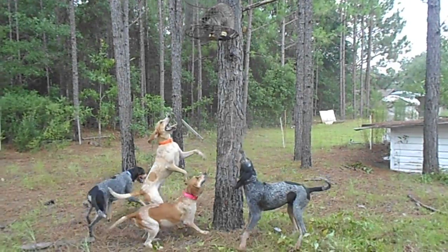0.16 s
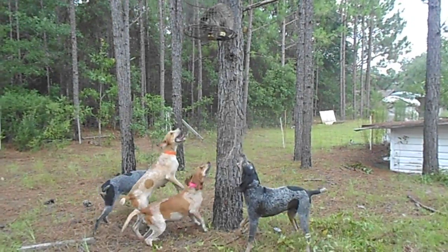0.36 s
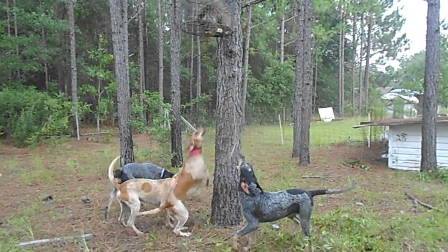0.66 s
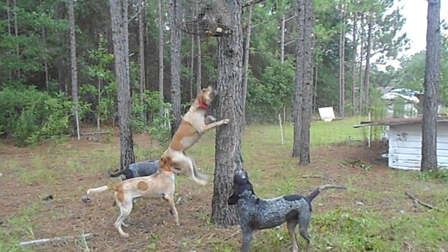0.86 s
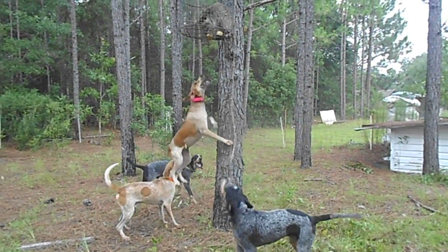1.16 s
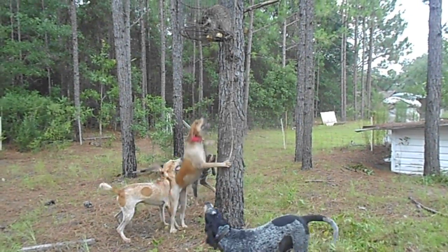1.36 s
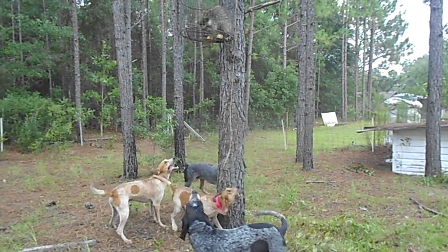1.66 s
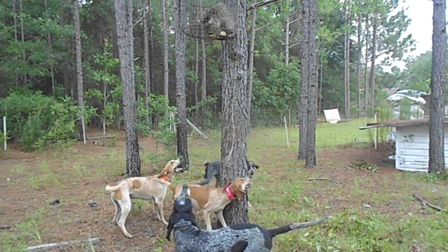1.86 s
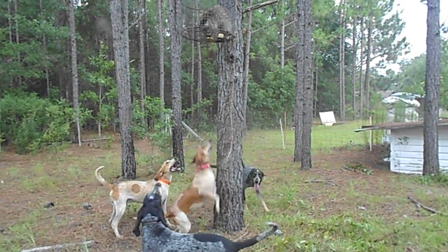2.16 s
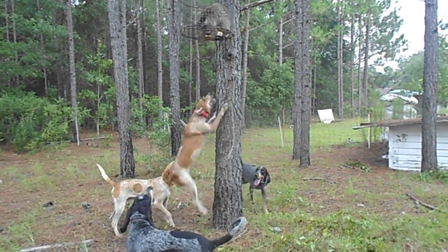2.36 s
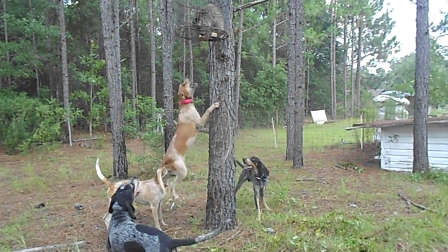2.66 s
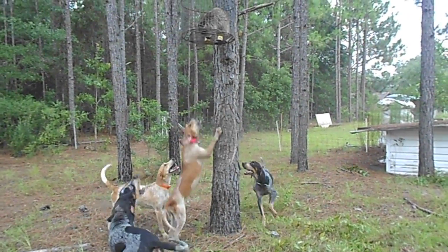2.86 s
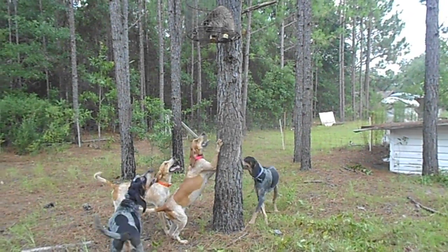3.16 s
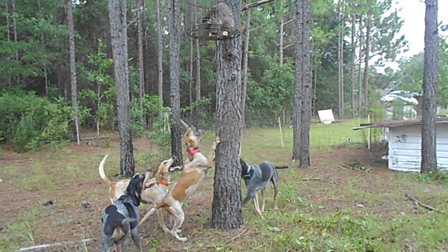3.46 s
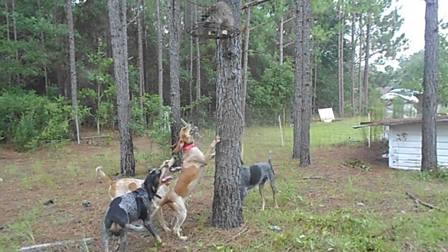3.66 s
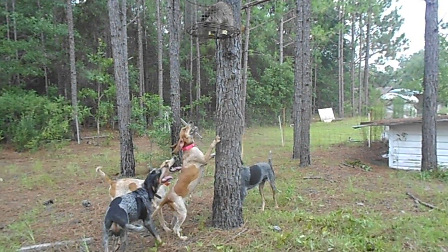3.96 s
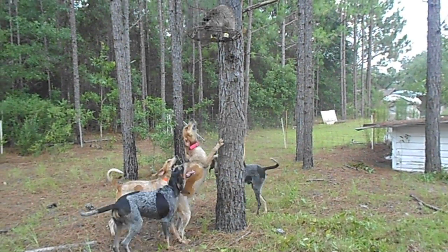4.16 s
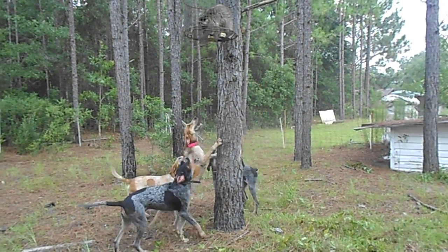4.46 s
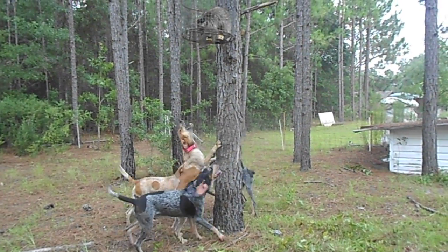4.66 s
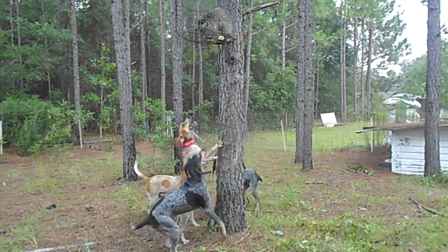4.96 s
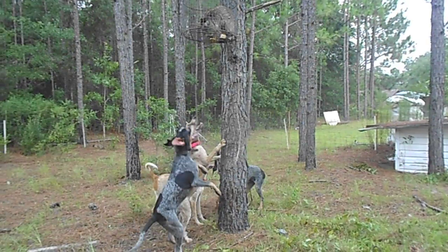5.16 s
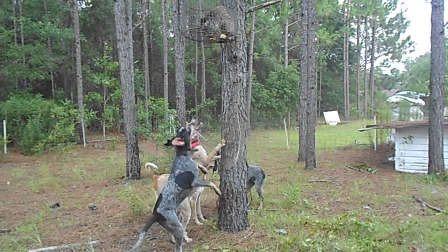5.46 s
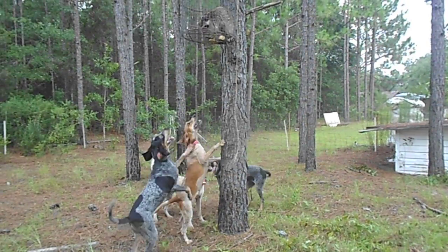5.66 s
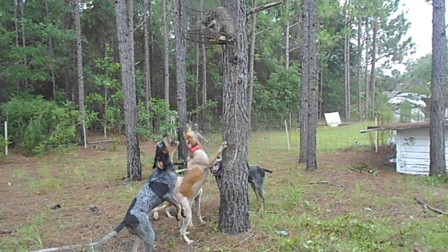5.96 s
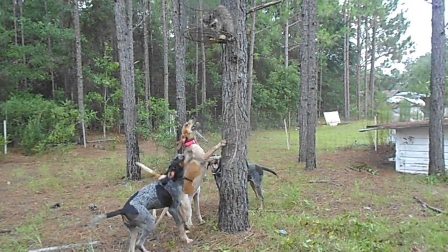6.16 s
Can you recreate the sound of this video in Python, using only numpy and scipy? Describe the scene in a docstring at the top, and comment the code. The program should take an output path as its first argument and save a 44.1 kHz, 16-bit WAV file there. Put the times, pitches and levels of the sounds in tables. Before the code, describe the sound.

A pack of hounds bays up a tree in a pine wood, falling howls that break low alternating with rough barks, yips and hoarse bawls.

```python
"""A short yip over a rustling pine wood, then a clear howl that breaks low: a pack of hounds bays up a tree.
Falling howls alternate with rough barks and hoarse bawls, among yips, whines and thin squeaks.
Voices are harmonic sums shaped by throat and mouth, with roughness as random modulation; squeaks are sines.
Trunks echo singly and far trees ring in a noise tail; rustle is shaped noise. Rustle and ring sink under
the cries and swell in the pauses. Fierce onsets overload, a limiter holds peaks, the loudest bark crackles."""
import sys
import numpy as np
from scipy import signal
from scipy.io import wavfile
from scipy.ndimage import uniform_filter1d, minimum_filter1d

SR = 44100
rng = np.random.default_rng(int(sys.argv[2]) if len(sys.argv) > 2 else 0)


def pcm_store(signal):
    """Save signal as 16-bit PCM."""
    levels = np.round(np.clip(np.atleast_2d(signal), -1, 1) * 32767)
    wavfile.write(sys.argv[1], SR, levels.astype(np.int16).T)


N = 279153
TIME_S = np.arange(N) / SR

# Relative rustle spectrum of pine straw and air in the trees: freq_hz, density_db_per_hz
RUSTLE_SPECTRUM = [(20, -23), (60, -6), (150, -11.5), (260, -12.5), (520, -7), (1050, -7), (1500, -15),
                   (2700, -26), (3500, -38), (5500, -57.5), (8000, -33), (10100, -26), (11500, -45),
                   (13000, -62.5)]
# Decay of the wood's ring: freq_hz, t60_s
WOOD_DECAY = [(200, 0.54), (600, 1.1), (1200, 1.4), (3000, 1.3), (9000, .2)]
# Relative resonance curve of the throat: freq_hz, response_db
THROAT_RESPONSE = [(150, -32), (280, -3.5), (450, 8.5), (600, -4), (800, 5.5), (1100, -4.5), (1400, -11.5),
                   (1900, -25.5), (2500, -43), (3400, -64.5), (5200, -76), (7000, -69.5), (9500, -51),
                   (11500, -70)]
# Thin high squeaks: start_s, length_s, pitch_hz, level_db
SQUEAK_EVENTS = [(0.025, .06, 7100, -54.5), (0.701, .07, 7150, -51), (3.848, .04, 8100, -50)]
# Short yips, some alone, some as a howl begins or gives out:
# start_s, length_s, top_pitch_hz, level_db, open_mouth_db
YIP_EVENTS = [(0.07, 0.083, 375, -22.5, -3), (0.303, 0.061, 558.7, -22.5, -4),
              (0.51, .04, 420, -28.5, -4.5), (1.169, 0.031, 489.4, -24, 2), (2.516, .068, 575, -16, 3.5),
              (3.136, 0.047, 494.4, -27, 9.5), (6.166, 0.023, 494, -25, 3.5)]
# Head-voice whines: start_s, length_s, first_pitch_hz, last_pitch_hz, first_level_db, last_level_db,
# open_mouth_db, edge_db, roughness_0_to_1
WHINE_EVENTS = [(0.102, .036, 1035, 647, -5, -10.5, 10, 1.5, 0.3),
                (1.845, 0.081, 675, 740, -47, -27, 35, 10, .06),
                (2.75, 0.083, 750, 538.5, -7.5, -19, -10.5, 4, .45),
                (4.181, .084, 690, 817, -36.5, -29.5, 43.5, 29.5, .12),
                (4.657, 0.049, 755, 758.5, -27.5, -19.5, -0.5, 6, 0)]
# Hoarse held notes, one curve each: time_s, pitch_hz, level_db, open_mouth_db, edge_db, roughness_0_to_1
BAWL_CURVES = [
    [(1.335, 393.3, -35, 10, 9, .95), (1.39, 418.2, -13.5, 26.5, 5.5, 0.1),
     (1.412, 488, -18.5, -2.5, -11.5, .26), (1.52, 497, -16, 0.5, -19.5, .22),
     (1.62, 495, -15, -7, -5.5, .25), (1.662, 512.7, -16.5, 10, 7, .48), (1.69, 571, -21, -2, 0.5, .54),
     (1.76, 577.4, -19, -18.5, -16, .12), (1.81, 538, -31, -4.5, 5.5, .5)],
    [(4.835, 515.4, -30.5, -15, -12.5, 0.1), (4.9, 529.6, -22.5, -10, -9, 0.1),
     (4.945, 467.7, -25.5, 1.5, -9.5, 0.8), (5.0, 446.6, -23.5, 2, -18, 0.4),
     (5.055, 512.7, -20, -7.5, -17.5, 0.6), (5.18, 500, -24.5, -4, -16, .55),
     (5.262, 483.4, -34.5, -2, -2.5, 0.9)],
]
# Barks that climb, roughen at the turn and close duller: start_s, length_s, attack_s, climb_s, turn_after_s,
# final_drop_s, top_pitch_hz, closing_pitch_hz, head_level_db, head_level_at_turn_db, closing_level_db,
# turn_roughness (clipped to 0-1), period_doubling_db
BARK_EVENTS = [(2.658, .248, .048, .105, .125, 0.0042, 535, 547, -12.5, -20, -21.5, .9, 7),
               (3.36, .252, .044, .105, .135, .01, 560, 539, -17, -17.5, -21, .7, -9),
               (3.976, 0.2, 0.039, .08, .105, .028, 498, 558.6, -6.5, -15.5, -21, 0.8, -12.5),
               (4.575, 0.26, .07, 0.11, .15, .04, 520, 546, -36, -26.5, -26.5, 1.1, -2),
               (5.255, .226, .035, 0.078, .118, 0.013, 530, 535, -27, -16.5, -21, 0.9, -9)]
# Howls that slide down and break: start_s, high_part_s, low_part_s, attack_s, slide_time_s, top_pitch_hz,
# pitch_before_break_hz, pitch_after_break_hz, high_level_db (before gape lift), low_level_db,
# opening_gape_db, gape_held_s, opening_roughness_0_to_1, high_edge_db (before gape lift), low_edge_db
HOWL_EVENTS = [(.124, .112, .115, 0.0028, .2, 518.8, 562.8, 448.8, -16.5, -17.5, 41, .046, 0.4, 4, -12.5),
               (0.737, .157, .295, 0.013, .07, 793.7, 527, 437.1, -14, -18.5, 29, 0.022, .05, 0, -5.5),
               (1.918, 0.14, 0.1, 0.099, .055, 707, 533.3, 423, -13.5, -19, 14.5, .03, .08, 0, -3),
               (2.89, .161, .12, .045, 0.058, 678, 532.8, 422.6, -13, -21.5, 10.5, 0.026, 0.4, -5.5, -9),
               (4.255, .138, 0.16, 0.049, 0.036, 786.5, 526.3, 413.7, -15.5, -24, 13.5, .07, .15, -4, 1.5),
               (5.782, 0.18, .222, .01, .4, 607.5, 495, 431.8, -15.5, -18, 37, .074, 0.3, 2, -7.5)]
# Onsets that overload: from_s, to_s, crest_cut_share
OVERLOAD_SPANS = [(0.105, 0.157, 0.31), (5.793, 5.817, 0.14)]
# Crackles in the loudest bark: time_s
CRACKLE_TIMES_S = [4.0087, 4.011, 4.014, 4.0166, 4.0196, 4.0259, 4.0272, 4.0345, 4.0366]

# background level between cries and under them; threshold of a loud cry; time constants
OPEN_DB, SUNK_DB, LOUD_DB = -37, -60.5, -38
LAG_S, SINK_S, RECOVER_S = 0.11, 0.19, 0.1

# all voices; width on a natural-log frequency axis
MOUTH_HZ, MOUTH_WIDTH_LN = 1070, 0.23
# growth of rasp from one harmonic to the next
GRUFF_RISE, HOARSE_RISE = 0.12, 0.45

# yips: arch as a share of pitch
YIP_ARCH_SHARE, YIP_ENDS_DB, YIP_EDGE_DB, YIP_ROUGH = 0.27, -12, -4, 0.2
BAWL_DOUBLING_DB = -18.5

# barks: first pitch and final drop as shares of pitch, widths and positions as shares of length
BARK_START_SHARE, BARK_DROP_SHARE, BARK_ONSET_DB, BARK_RELEASE_S = 0.56, 0.28, -24, 0.01
TURN_WIDTH_SHARE, DOUBLING_AT_SHARE = 0.11, 0.74
HEAD_MOUTH_DB, HEAD_EDGE_DB, CLOSE_MOUTH_DB, CLOSE_EDGE_DB, BARK_ROUGH = 7.5, 11.5, 3.5, -16.5, 0.36
PUSH_DB, PUSH_BEFORE_END_S, PUSH_WIDTH_S = 7, 0.0073, 0.012  # a last shove of breath

# howls: high register with narrowed mouth, lingering after the break
BREAK_S, GAPE_CLOSE_S, HOWL_RELEASE_S = 0.029, 0.0076, 0.0047
SHUT_DB, HIGH_ROUGH, LINGER_DB = -10, 0.11, -18
GAPE_LEVEL_DB_PER_DB, GAPE_EDGE_DB_PER_DB = 0.16, 0.6
# howls: low register, which sags and then drops as the breath runs out (shares of pitch)
LOW_MOUTH_DB, LOW_DOUBLING_DB, LOW_FADE_DB = 10.5, -10.5, -15
LOW_SAG_SHARE, LOW_DROP_SHARE, LOW_ROUGH, SPENT_ROUGH = 0.092, 0.22, 0.16, 0.69

# limiter ceiling and hard crackle limit (shares of full scale); band limit
CEILING, PEAK, BAND_LIMIT_HZ = 0.72, 0.76, 16500


def gain_of(db):
    """Decibels to amplitude."""
    return 10 ** (np.asarray(db) / 20)


def evened(x):
    """Scales to rms 1."""
    return x / np.sqrt(np.mean(abs(x) ** 2) + 1e-20)


def read(points, hz):
    """Interpolates a table on a log-frequency axis."""
    table_hz, value = np.transpose(points)
    return np.interp(np.log(hz + 1), np.log(table_hz + 1), value)


def add(mix, start_s, sound):
    """Adds a sound to the mix in place."""
    part = mix[max(round(start_s * SR), 0):][:len(sound)]
    part += sound[:len(part)]


def ages(length_s):
    """Seconds since the start of an event."""
    return np.arange(0, length_s, 1 / SR)


def ramp(x):
    """Rises from 0 to 1 and stays there."""
    return np.clip(x, 0, 1)


def ease(x):
    """A soft step from 0 to 1 around x = 0."""
    return 0.5 + 0.5 * np.tanh(x / 2)


def bell(x):
    """A bell of height 1 around x = 0."""
    return np.exp(-0.5 * x ** 2)


def bump(hz, centre_hz, width_ln):
    """A bell of height 1 on a log-frequency axis."""
    return bell(np.log(hz / centre_hz) / width_ln)


def wander(t_s, width_hz, size=2048):
    """Smooth complex noise: Gaussian-shaped spectrum, rms 1 over one second."""
    hz = np.fft.fftfreq(size, 1 / size)
    noise = rng.standard_normal(size) + 1j * rng.standard_normal(size)
    smooth = evened(np.fft.ifft(noise * bell(hz / width_hz)))
    return np.interp((t_s - t_s[0]) * size, np.arange(size), smooth)


def rustle(patchy_db=2.5, flicker_db=2.33):
    """Paws shuffle in pine straw: rms-1 noise, patchy in time and pitch, flickering over all bands."""
    frames, hz = N // 128 + 5, np.fft.rfftfreq(512, 1 / SR)
    real, imag, patches = rng.standard_normal((3, frames, len(hz)))
    patches = uniform_filter1d(patches, size=10, axis=0)
    patches = evened(uniform_filter1d(patches, size=10, axis=1))
    flicker = evened(uniform_filter1d(rng.standard_normal(frames), size=3))[:, None]
    shape_db = read(RUSTLE_SPECTRUM, hz) + patchy_db * patches + flicker_db * flicker
    spectrum = (real + 1j * imag) * gain_of(shape_db)
    return evened(signal.istft(spectrum.T, nperseg=512, noverlap=384)[1][:N])


def background_db(hounds, step=256):
    """Background level: sinks slowly under loud cries and recovers in the pauses, always a little late."""
    power = abs(uniform_filter1d(hounds ** 2, size=4 * step))[::step]
    loud = ease((10 * np.log10(power + 1e-12) - LOUD_DB) / 2)
    sunk = [0.]
    for share in loud[1:]:
        sinking = share * (1 - sunk[-1]) / SINK_S
        recovering = (1 - share) * sunk[-1] / RECOVER_S
        sunk.append(sunk[-1] + step / SR * (sinking - recovering))
    return OPEN_DB + (SUNK_DB - OPEN_DB) * np.interp(TIME_S - LAG_S, TIME_S[::step], sunk)


def wood(x):
    hz, t_s, spectrum = signal.stft(rng.standard_normal(SR * 3 // 2), SR, nperseg=256)
    decay = gain_of(-60 * t_s / read(WOOD_DECAY, hz)[:, None])
    build_up = 1 - np.exp(-t_s / 0.09)
    tail = signal.istft(spectrum * decay * build_up, SR, nperseg=256)[1]
    return evened(signal.fftconvolve(x, tail)[:N]) * np.std(x)


def trunks(x, near_db=-21, count=8):
    """Single quick echoes off the ground and the nearest trees."""
    taps = np.zeros(SR // 10)
    delays = (rng.uniform(0.004, 0.06, count) * SR).astype(int)
    taps[delays] = rng.choice([-1., 1.], count)
    return gain_of(near_db) * signal.oaconvolve(x, taps / np.sqrt(count))[:N]


def squeak(start_s, length_s, pitch_hz, level_db, waver=0.012):
    """A faint whistle: one sine of wavering pitch under a half-sine swell."""
    age = ages(length_s)
    wavering_hz = pitch_hz * (1 + waver * wander(age, width_hz=40).real)
    phase = 2 * np.pi * np.cumsum(wavering_hz) / SR
    return start_s, gain_of(level_db) * np.sin(np.pi * age / length_s) * np.sin(phase)


def cry(t_s, pitch_hz, level_db, mouth_db, edge_db, rough, doubled, rasp_rise, nasal_db, bright_db,
        nasal_hz=2150, bright_hz=4000, jitter=0.041, flutter_hz=85, rasp=0.79, between=1.0, count=44):
    """Vocal-fold harmonics, shaken by roughness, shaped by throat, open mouth (near 1 kHz) and treble edge."""
    rough = np.clip(rough, 0, 1)
    shake = jitter * (0.33 + 2 * rough) * wander(t_s, flutter_hz).real
    phase = 2 * np.pi * np.cumsum(pitch_hz * (1 + shake)) / SR
    voice, power = np.zeros(len(t_s)), np.zeros(len(t_s))
    for k in np.arange(1, count) / 2:
        hz = k * pitch_hz
        timbre_db = read(THROAT_RESPONSE, hz)
        timbre_db += nasal_db * bump(hz, nasal_hz, 0.14) + bright_db * bump(hz, bright_hz, 0.11)
        timbre_db += mouth_db * bump(hz, MOUTH_HZ, MOUTH_WIDTH_LN)
        timbre_db += edge_db * ramp(np.log2(hz / 1100))
        # the voice ends with the throat's range
        size = gain_of(timbre_db) * ramp((THROAT_RESPONSE[-1][0] - hz) / pitch_hz + 0.5)
        smear = ramp(rasp * rough * (1 + rasp_rise * (k - 1)))  # high harmonics lose their line first
        if k % 1:  # between harmonics: only period doubling and rasp
            line, noise = doubled, between * smear ** 2
            size = size * (gain_of(-11.5) if k < 1 else 1)
        else:
            line, noise = np.sqrt(1 - smear ** 2), smear
        carrier = np.exp(1j * (k * phase + 2 * np.pi * rng.random()))
        voice += size * ((line + noise * wander(t_s, flutter_hz)) * carrier).real
        power += size ** 2 * (line ** 2 + noise ** 2) / 2
    voice *= 1 + 0.5 * rough * wander(t_s, flutter_hz / 2).real  # rough folds also throb as a whole
    fade = ramp(np.minimum(t_s - t_s[0], t_s[-1] - t_s) / 0.007)
    return t_s[0], gain_of(level_db) * fade * voice / np.sqrt(power)


def yip(start_s, length_s, top_hz, level_db, mouth_db):
    """Pitch and level follow one quick arch."""
    age = ages(length_s)
    ends = (2 * age / length_s - 1) ** 2
    return cry(start_s + age, top_hz * (1 - YIP_ARCH_SHARE * ends), level_db + YIP_ENDS_DB * ends,
               mouth_db, YIP_EDGE_DB, YIP_ROUGH, 0, rasp_rise=GRUFF_RISE, nasal_db=2.5, bright_db=-1)


def whine(start_s, length_s, first_hz, last_hz, first_db, last_db, mouth_db, edge_db, rough):
    """One high glide that levels off."""
    age = ages(length_s)
    glide = 1 - (1 - age / length_s) ** 2
    pitch_hz = first_hz + (last_hz - first_hz) * glide
    level_db = first_db + (last_db - first_db) * glide
    return cry(start_s + age, pitch_hz, level_db, mouth_db, edge_db, rough, 0,
               rasp_rise=0.2, nasal_db=6.5, bright_db=9.5)


def bawl(rows):
    """A held, hoarse note whose upper harmonics dissolve into rasp."""
    knots_s, *columns = np.transpose(rows)
    t_s = np.arange(knots_s[0], knots_s[-1], 1 / SR)
    controls = [np.interp(t_s, knots_s, column) for column in columns]
    return cry(t_s, *controls, gain_of(BAWL_DOUBLING_DB),
               rasp_rise=HOARSE_RISE, nasal_db=12, bright_db=3, nasal_hz=2560)


def bark(start_s, length_s, attack_s, climb_s, turn_s, drop_s, top_hz, close_hz, head_db, turn_db, close_db,
         turn_rough, doubling_db):
    """A bright climbing head, a rough turn, and a duller close that beats strong-weak and drops away."""
    age = ages(length_s + 2 * BARK_RELEASE_S)
    left_s = length_s - age
    turn = (age - turn_s) / length_s / TURN_WIDTH_SHARE
    closing = ease(2 * turn)
    rise = np.sin(np.pi / 2 * ramp(age / climb_s)) ** 1.5
    head_hz = top_hz * (BARK_START_SHARE + (1 - BARK_START_SHARE) * rise)
    drop_hz = close_hz * (1 - BARK_DROP_SHARE * np.exp(-np.maximum(left_s, 0) / drop_s))
    head_level_db = np.interp(age, [0, attack_s, turn_s], [head_db + BARK_ONSET_DB, head_db, turn_db])
    close_level_db = close_db + PUSH_DB * bell((left_s - PUSH_BEFORE_END_S) / PUSH_WIDTH_S)
    head = (head_hz, head_level_db, HEAD_MOUTH_DB, HEAD_EDGE_DB)
    close = (drop_hz, close_level_db, CLOSE_MOUTH_DB, CLOSE_EDGE_DB)
    controls = [a + (b - a) * closing for a, b in zip(head, close)]
    rough = BARK_ROUGH + (turn_rough - BARK_ROUGH) * bell(turn)
    doubled = gain_of(doubling_db) * bell((age / length_s - DOUBLING_AT_SHARE) / TURN_WIDTH_SHARE)
    _, sound = cry(start_s + age, *controls, rough, doubled,
                   rasp_rise=GRUFF_RISE, nasal_db=10, bright_db=16.5)
    return start_s, sound * np.exp(-np.maximum(BARK_RELEASE_S - left_s, 0) / BARK_RELEASE_S)


def howl(start_s, high_s, low_s, attack_s, slide_s, top_hz, break_hz, low_hz, high_db, low_db, gape_db,
         gape_s, gape_rough, high_edge_db, low_edge_db):
    """The mouth gapes and narrows as the pitch slides down; the voice breaks, then sags and frays."""
    age = ages(high_s + low_s + 2 * HOWL_RELEASE_S)
    gape = ease((gape_s - age) / GAPE_CLOSE_S)
    broken = ramp((age - high_s) / BREAK_S + 0.5)
    spent = ramp((age - high_s) / low_s)
    slide = ramp(np.expm1(-age / slide_s) / np.expm1(-high_s / slide_s))
    _, high = cry(start_s + age, top_hz + (break_hz - top_hz) * slide,
                  high_db + GAPE_LEVEL_DB_PER_DB * gape_db * gape, SHUT_DB + gape_db * gape,
                  high_edge_db + GAPE_EDGE_DB_PER_DB * gape_db * gape,
                  HIGH_ROUGH + (gape_rough - HIGH_ROUGH) * gape, 0,
                  rasp_rise=0.46, nasal_db=1, bright_db=0.5, jitter=0.011)
    sagging_hz = low_hz * (1 - LOW_SAG_SHARE * spent - LOW_DROP_SHARE * spent ** 8)
    _, low = cry(start_s + age, sagging_hz, low_db, LOW_MOUTH_DB, low_edge_db,
                 LOW_ROUGH + (SPENT_ROUGH - LOW_ROUGH) * spent ** 3, gain_of(LOW_DOUBLING_DB),
                 rasp_rise=0.75, nasal_db=4, bright_db=-2)
    after_break = (low + gain_of(LINGER_DB) * high) * gain_of(LOW_FADE_DB * spent ** 3)
    # the fade is 0 dB until the break, so the high voice before it is left unfaded; the first term adds nothing
    voice = high * (1 - broken) * gain_of(LOW_FADE_DB * spent ** 3) * 0 + high * (1 - broken) + broken * after_break
    release = np.exp(-np.maximum(age - high_s - low_s, 0) / HOWL_RELEASE_S)
    return start_s, voice * ramp(age / attack_s) * release


def scene(wood_db=-26, wood_follow=0.9):
    """The pack's cries, their echoes and the background that swells between them."""
    hounds = np.zeros(N)
    voices = ((squeak, SQUEAK_EVENTS), (yip, YIP_EVENTS), (whine, WHINE_EVENTS),
              (bark, BARK_EVENTS), (howl, HOWL_EVENTS))
    for voice, events in voices:
        for row in events:
            add(hounds, *voice(*row))
    for rows in BAWL_CURVES:
        add(hounds, *bawl(rows))
    swell_db = background_db(hounds)
    ring = gain_of(wood_db + wood_follow * (swell_db - swell_db.mean())) * wood(hounds)
    return (hounds + trunks(hounds) + ring + gain_of(swell_db) * rustle())[None]


def overload(x, top_hz=3900):
    """Flattened crests, low-passed, give the fiercest onsets harsh odd harmonics."""
    crest = uniform_filter1d(-minimum_filter1d(-abs(x), size=100), size=100)
    cut = np.zeros(N)
    for from_s, to_s, share in OVERLOAD_SPANS:
        cut += share * ramp(np.minimum(TIME_S - from_s, to_s - TIME_S) / 0.0041)
    limit = crest * (1 - np.clip(cut, 0, 0.5))
    shaved = np.where(cut > 0, x - np.clip(x, -limit, limit), 0)
    return x - signal.sosfiltfilt(signal.butter(4, top_hz, fs=SR, output="sos"), shaved)


def limiter(x):
    """Smoothed gain reduction holds the peaks at the ceiling."""
    headroom = np.minimum(1, CEILING / (abs(x) + 1e-9))
    return x * uniform_filter1d(minimum_filter1d(headroom, size=200), size=200)


def crackles(x, push=1.0, chatter=1.3, top_hz=9000, size=20):
    """Each crackle throws the wave toward its hard limits for about half a millisecond."""
    spikes = np.zeros(N)
    for time_s in CRACKLE_TIMES_S:
        ragged = rng.standard_normal(size)
        add(spikes, time_s, push + chatter * evened(uniform_filter1d(ragged - ragged.mean(), size=3)))
    change = np.clip(x + spikes, -PEAK, PEAK) - x
    return x + signal.lfilter(*signal.butter(2, top_hz, fs=SR), change)


def record(dry):
    """Overload, limiter and crackles in turn, then the band limit."""
    x = crackles(limiter(overload(dry[0])))
    low_pass = signal.firwin(255, BAND_LIMIT_HZ, window=("kaiser", 9), fs=SR)
    return signal.oaconvolve(x, low_pass, "same")[None]


dry = scene()
out = record(dry)
pcm_store(out)
```